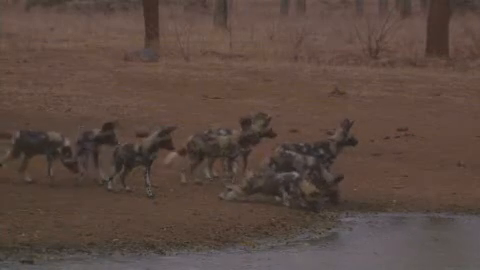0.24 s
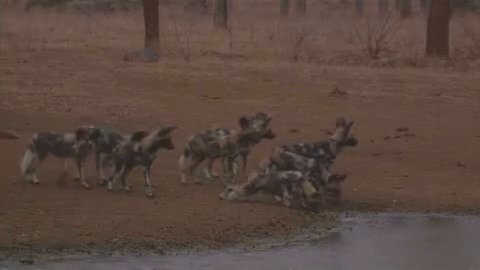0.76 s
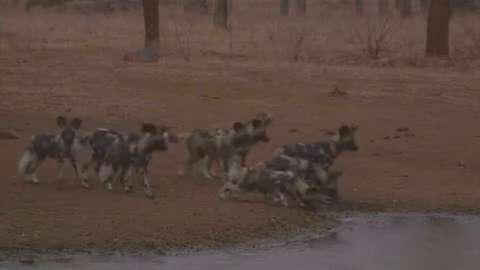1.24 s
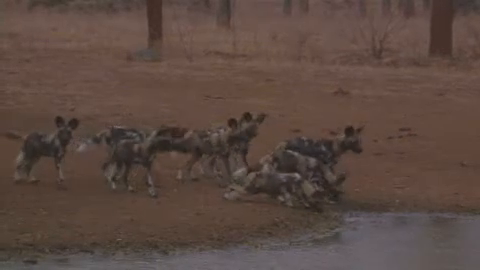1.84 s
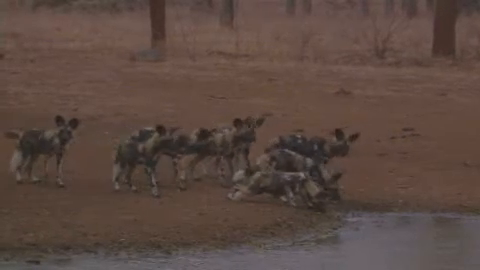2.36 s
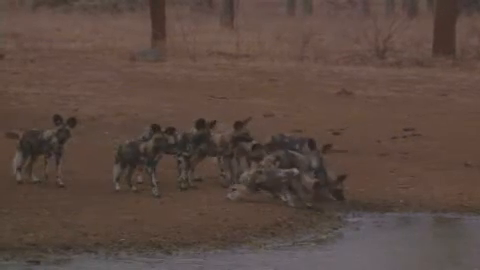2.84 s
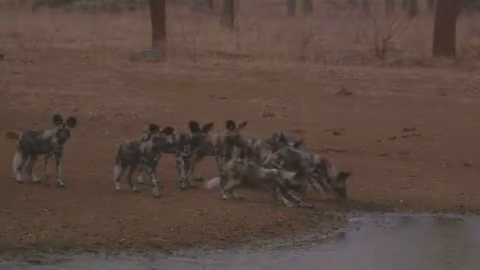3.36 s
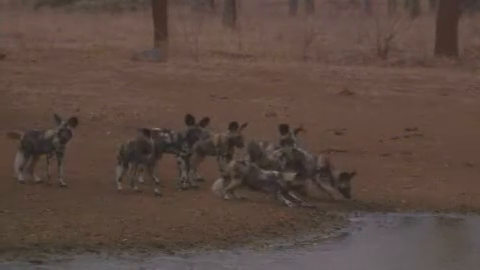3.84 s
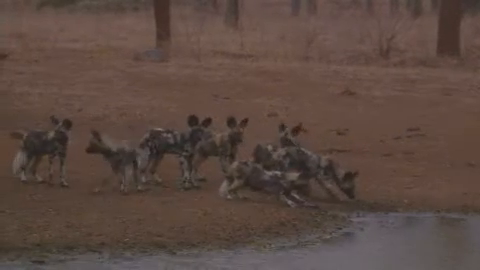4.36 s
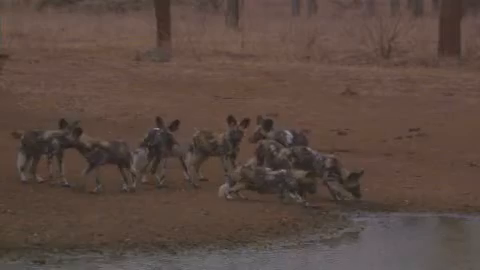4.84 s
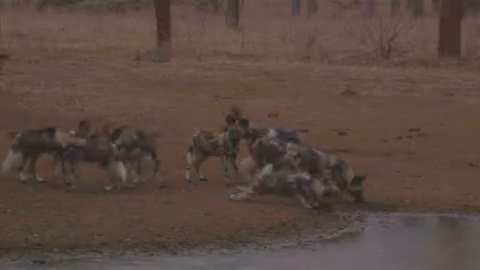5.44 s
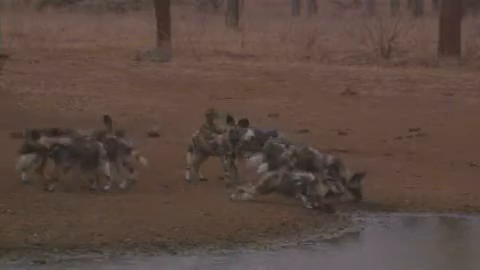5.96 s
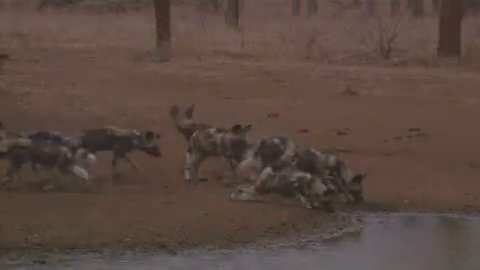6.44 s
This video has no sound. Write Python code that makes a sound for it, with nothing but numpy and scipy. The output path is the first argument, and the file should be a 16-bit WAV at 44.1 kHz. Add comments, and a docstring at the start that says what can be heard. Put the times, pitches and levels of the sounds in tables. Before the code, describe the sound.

Low wind rumbles on the microphone in open dry bush. Some way off, wild dog pups squeak, whine and twitter in a blurred crowd, with a quick hoarse yip run early on. Nearer, two small birds repeat buzzy trills of falling chips that start soft and fast, swell and slow. A hoarse far bird calls two-note phrases and insects chirp faintly. Knocks rattle beside the microphone at the end.

```python
"""From the start wind rumbles (shaped noise) over a quiet bush, a faint hum, insects and a hoarse far bird.
Wild dog pups jostle some way off at a waterhole: gliding whistles squeak and whine, hoarse yips come early,
then one low hoot, perhaps a far dove; a crowd of tiny whistles blurs into twitter. Nearer, a small bird and
its mate repeat slowing trills of falling chips. Now and then something knocks beside the microphone, as filtered
hits that ring a housing; near the end come a thin ring, a rattle of knocks and one dry tick."""
import sys
import numpy as np
from scipy import signal
from scipy.fft import rfft, irfft, next_fast_len
from scipy.io import wavfile
from scipy.ndimage import uniform_filter1d

SR = 44100
rng = np.random.default_rng(int(sys.argv[2]) if len(sys.argv) > 2 else 0)


def int16_out(signal):
    """Quantize to a 16-bit WAV file."""
    q = np.round(np.clip(np.atleast_2d(signal).T, -1, 1) * 32767)
    wavfile.write(sys.argv[1], SR, q.astype(np.int16))


N = 295911
T = np.arange(N) / SR  # time in seconds

# Falling squeaks of the pups. Each row: start in seconds, length of the dive in seconds, top pitch in Hz,
# hold at the bottom in seconds, level in dB.
SQUEAKS = [(.112, .035, 3930, 0, -59), (1.194, 0.032, 3850, 0, -53), (1.232, 0.018, 3540, 0, -62),
           (1.26, .029, 3600, 0, -54.5), (1.35, .027, 3260, 0, -58), (3.673, .03, 4005, 0.00006, -56),
           (3.728, .04, 3850, 0.017, -59.5), (4.5, 0.026, 3800, 0.0027, -65),
           (4.53, 0.028, 4040, 0.0055, -60), (5.419, .035, 3980, 0, -67), (6.033, 0.038, 3950, 0.016, -55),
           (6.092, 0.032, 3830, 0.0048, -51.5), (6.498, 0.028, 4000, .024, -57.5)]
# Short whines and squeaks of the pups, some longer, with a smooth glide or steady pitch, and one low hoot
# at 0.82 s, perhaps a far dove. Each row: start in seconds, length in seconds, middle pitch in Hz,
# glide from start to end in Hz, level in dB, waver as a share of the pitch.
GLIDES = [(0.024, 0.047, 2380, 450, -61, 0.031), (.13, .11, 2790, -280, -68, 0.0096),
          (.82, 0.33, 815, -1, -67.5, 0.048), (.945, .17, 2170, 154, -62, 0.042),
          (1.112, .06, 2435, 150, -58, 0.055), (1.166, 0.048, 2380, -100, -51, 0.024),
          (1.21, .06, 2370, -200, -53, 0.031), (1.267, 0.051, 2230, 150, -55, 0.037),
          (1.847, 0.062, 2765, 2, -54.5, .003), (1.894, .07, 2705, 32, -58.5, 0.0035),
          (2.001, .2, 2675, -250, -64, .045), (2.169, .05, 1800, -400, -69, .07),
          (3.029, .12, 1680, 0, -69.5, 0.065), (3.78, 0.062, 2610, -200, -68, .03),
          (5.391, 0.036, 3860, -700, -62, .038), (6.084, 0.059, 1505, -120, -57, 0.022)]
# Short hoarse yips of a pup. Each row: middle of the yip in seconds, pitch in Hz, level in dB.
YIPS = [(0.522, 1041, -49), (.553, 1093, -50), (.58, 1037, -52), (0.607, 1037, -55), (.627, 1060, -49.5)]
# Loudness of the whole litter's chatter. Each row: time in seconds, level in dB before a common trim.
CHATTER = [(0, -60.5), (.35, -63), (.82, -70), (1.17, -60), (1.35, -64), (2.12, -64), (2.3, -70.5),
           (3.65, -72.5), (3.85, -69.5), (4.2, -69), (4.55, -64.5), (4.9, -75.5), (5.8, -73.5),
           (6.15, -65.5), (6.4, -75), (6.7, -70)]
# How loud the litter's twitters are at each pitch. Each row: pitch in Hz, level in dB.
TWITTER = [(1700, -15.5), (2200, -2), (2800, 0), (3600, -0.5), (4600, -4), (5600, -15), (7000, -11.5)]
# Trills of the two birds. Each row: first chip in seconds, last chip in seconds, number of chips,
# number of gaps until it slows, full level in dB before a common trim, extra dB at the soft start, pitch in Hz.
TRILLS = [(.038, .038, 1, 0, -41.5, 0, 3760), (.127, .656, 11, 4.9, -43, -6, 3805),
          (1.304, 1.685, 8, .5, -42, -8, 3760), (1.538, 2.061, 11, 4.8, -43, -7, 3815),
          (2.980, 3.537, 12, 4.4, -42, -9, 3820), (3.122, 3.550, 9, 2.7, -43.5, -7, 3740),
          (4.343, 4.866, 11, 5.1, -43, -8, 3800), (4.518, 5.012, 11, 4.0, -42.3, -11, 3760),
          (5.772, 6.319, 11, 4.5, -43, -8, 3805), (6.217, 6.591, 8, 1.0, -42, -5, 3770)]
# Calls of the far bird. Each row: start in seconds, level of the first note in dB.
FAR_CALLS = [(.81, -71), (1.75, -70), (2.66, -60), (3.33, -66), (4.02, -65), (4.69, -65.5), (5.38, -62.5),
             (6.09, -61.5)]
# Knocks by the microphone. Each row: start in seconds, peak in dB before the echo, brightness limit in Hz.
KNOCKS = [(3.269, -47.5, 700), (3.636, -50, 350), (5.825, -47, 2500), (6.27, -44, 786), (6.593, -46, 600),
          (6.61, -46, 347), (6.64, -41, 4000), (6.647, -31.5, 3020), (6.676, -45.5, 2220)]
# Resonances of the knocked housing. Each row: pitch in Hz, width in Hz, strength in dB.
HOUSING = [(356, 89, 0.5), (875, 260, 4), (1680, 1000, -0.5), (2100, 64, -5), (2650, 70, -37),
           (5150, 1600, -11)]
# Strength of the wind. Each row: time in seconds, rumble in dB and buffeting in dB, both before a trim.
WIND = [(0, -35.5, -48.5), (.15, -38, -46.5), (.41, -40.5, -45.5), (.5, -34, -42.5), (.75, -38.5, -41),
        (.85, -39.5, -46.5), (1.25, -41, -53), (1.55, -39, -45), (1.95, -40.5, -43.5), (2.2, -44, -50),
        (2.93, -42.5, -54.5), (3.1, -45, -58), (3.9, -51.5, -62.5), (4.05, -46.5, -56.5),
        (5.15, -47.5, -64.5), (5.33, -42.5, -57), (5.5, -47, -61), (6.71, -43.5, -55.5)]
# Tone colour of the wind's low rumble. Each row: frequency in Hz, level in dB.
RUMBLE = [(4, 7.5), (14, 9.5), (22, -1.5), (38, -3.5), (55, -5.5), (80, -8.5), (110, -13.5), (150, -31.5)]
# Tone colour of the wind's quicker buffeting. Each row: frequency in Hz, level in dB.
BUFFET = [(50, -18.5), (90, -5.5), (125, 0), (200, -6.5), (300, -17), (450, -26.5), (900, -45.5)]
# Tone colour of the quiet bush. Each row: frequency in Hz, level in dB.
BUSH = [(150, 6), (350, 4), (480, 1), (620, 3.5), (740, 1.5), (880, 5), (1200, -2.5), (1800, -3),
        (2600, -3.5), (3600, -7), (5000, -12), (7000, -12), (10500, -12.5)]


def undb(db):
    """Turn decibels into a gain."""
    return 10 ** (np.asarray(db) / 20)


def unit(x):
    """Scale a sound to an average (rms) strength of 1."""
    return x / np.sqrt(np.mean(x ** 2))


def curve(rows, column=1):
    """Join one column of a table by straight lines in time."""
    rows = np.array(rows)
    return np.interp(T, rows[:, 0], rows[:, column])


def add(out, start_s, x):
    """Mix x into out from a start time, cutting whatever falls outside."""
    i = int(start_s * SR)
    x = x[max(-i, 0):max(N - i, 0)]
    out[max(i, 0):max(i, 0) + len(x)] += x


def noise(points):
    """Make noise of strength 1 whose tone colour follows (Hz, dB) points."""
    hz, db = np.transpose(points)
    size = next_fast_len(N, True)
    f = np.maximum(np.arange(size // 2 + 1) * SR / size, 1)
    gain = undb(np.interp(np.log(f), np.log(hz), db, left=-200, right=-200))
    spectrum = rfft(rng.standard_normal(size)) * gain
    return unit(irfft(spectrum, size)[:N])


def walk(rate_hz):
    """Wander smoothly and at random around 0, with a spread near 1."""
    k = max(int(SR / rate_hz), 1)
    steps = np.repeat(rng.standard_normal(N // k + 1), k)
    return 1.2 * uniform_filter1d(steps, k)[:N]


def resonance(x, hz, width_hz):
    """Ring at one pitch, with gain 1 at its centre."""
    return signal.lfilter(*signal.iirpeak(hz, hz / width_hz, SR), x)


def pan(x, db):
    """Place a sound between the two sides, by left minus right in dB."""
    return x * undb(np.array([[db], [-db]]) / 2)


def scatter(x, t60, wet_db, delay=0.0042):
    """Sound thrown back by trunks and brush: a tail that builds over delay (s) and fades 60 dB in t60 (s)."""
    t = T[:SR * 3 // 2]
    fade = undb(-60 * t / t60) * (1 - np.exp(-(t / delay) ** 2))
    tail = rng.standard_normal(len(t)) * fade
    return undb(wet_db) * signal.fftconvolve(x, tail / np.linalg.norm(tail))[:N]


def pups(yip_s=0.0028):
    """Squeaks, whines, one low hoot and a quick run of six-harmonic yips, with the bush ringing after them."""
    out = np.zeros(N)
    for s, length, top_hz, hold_s, db in SQUEAKS:
        add(out, s, undb(db) * dive(length, top_hz, hold_s))
    for s, length, hz, glide_hz, db, waver in GLIDES:
        pitches = (hz - glide_hz / 2, hz, hz + glide_hz / 2)
        add(out, s, undb(db) * squeak(length, pitches, waver))

    t = T[:SR // 40] - 1 / 80  # zero at the middle of a yip
    for s, hz, db in YIPS:
        rough = 0.12 * rng.standard_normal(len(t))  # random pitch makes it hoarse
        phase = 2 * np.pi * np.cumsum(hz * (1 - 4 * t + rough)) / SR
        mouth = enumerate([-8, -5.5, -4.5, -6, -17, -13.0])  # dB of each harmonic
        voice = sum(undb(mouth_db) * np.sin((k + 1) * phase) for k, mouth_db in mouth)
        add(out, s + t[0], undb(db) * np.exp(-(t / yip_s) ** 2) * voice)

    near_echo = scatter(out, t60=0.15, wet_db=-3.0)
    far_echo = scatter(out, t60=0.48, wet_db=-12.0, delay=0.023)
    return out + near_echo + far_echo


def dive(length, top_hz, hold_s, waver=.017, dive_share=.35, rebound_hz_per_s=5500):
    """A whistle loses a share of its top pitch, then may linger at the bottom while it creeps up."""
    t = T[:int((length + max(hold_s, 0)) * SR)]
    fall = np.sin(np.pi / 2 * np.minimum(t / length, 1)) ** 2
    rebound = rebound_hz_per_s * np.maximum(t - length, 0)
    return whistle(top_hz * (1 - dive_share * fall) + rebound, waver)


def squeak(length, pitches, waver=0.025):
    """A whistle glides smoothly through three pitches."""
    u = np.linspace(0, 1, max(int(length * SR), 8))
    bend = np.polyval(np.polyfit([0, .5, 1], pitches, 2), u)
    return whistle(bend, waver)


def whistle(bend, waver, octave_db=-26):
    """A thin voice follows a pitch curve; the more its pitch wavers, the more its level flutters."""
    u = np.linspace(0, 1, len(bend))
    chance = rng.standard_normal((2, 160))  # 400 random points a second
    tremor, flutter = (np.interp(T[:len(bend)] * 400, np.arange(160), row) for row in chance)
    phase = 2 * np.pi * np.cumsum(bend * (1 + waver * tremor)) / SR
    envelope = np.sqrt(4 * u * (1 - u)) * (1 + min(14 * waver, .6) * flutter)
    return envelope * (np.sin(phase) + undb(octave_db) * np.sin(2 * phase))


def litter(count=1700, level_db=-0.5):
    """Many small falling twitters, heard mostly by way of the bush, which blurs them to a hiss."""
    out = np.zeros(N)
    points_hz, points_db = np.transpose(TWITTER)
    for when, length, pitch in rng.random((count, 3)):
        hz = points_hz[0] + pitch * (points_hz[-1] - points_hz[0])
        gain = undb(np.interp(hz, points_hz, points_db))
        twitter = squeak(0.01097 + 0.0209 * length, hz * np.array([1.15, 1, .88]))
        add(out, when * N / SR, gain * twitter)
    blurred = unit(out + scatter(out, t60=0.45, wet_db=7))
    return blurred * undb(curve(CHATTER) + level_db)


def trill(length_s=0.0047, fall_hz_per_s=24000, onset_hz=50, onset_db=-32, lead=0.21, octave_db=-28,
          rough_hz=35, trim_db=1.0):
    """Each chip is a whistle that dives from a soft high start, loudest as it crosses the throat's resonance."""
    out = np.zeros(N)
    t = T[:SR // 20] - 1 / 40  # zero at the middle of a chip
    notes = chips()
    for (s, db, hz), chance in zip(notes, rng.standard_normal((len(notes), 20))):
        u = t * np.clip(undb(-(db + 43) * .4), .95, 1.35)  # soft chips are quicker
        quiver = np.interp(t, np.linspace(t[0], t[-1], len(chance)), chance)
        steep_start = onset_hz * np.maximum(-u / .008, 0) ** 2
        pitch_hz = hz + steep_start - fall_hz_per_s * u + rough_hz * quiver
        phase = 2 * np.pi * np.cumsum(pitch_hz) / SR

        blow = np.exp(-((u + .001) / .012) ** 4) * (1 + .4 * quiver)
        throat = np.exp(-(u / length_s) ** 2)
        onset = np.exp(-((u + .015) / .004) ** 2)
        envelope = (1 - lead) * throat + lead * blow + undb(onset_db) * onset
        octave = undb(octave_db) * (throat + blow) / 2 * np.sin(2 * phase)
        add(out, s + t[0], undb(db + trim_db) * (envelope * np.sin(phase) + octave))

    near_echo = scatter(out, t60=0.14, wet_db=-11.5, delay=0.0033)
    far_echo = scatter(out, t60=0.65, wet_db=-18.5, delay=0.015)
    return out + near_echo + far_echo


def chips(slowdown=1.64, slowing_chips=.8, swell_chips=6.0, scatter_db=.5, scatter_hz=11):
    """Trills start quick and soft, swell and slow down; gives (s, level dB, pitch Hz) for every chip."""
    rows = []
    for first_s, last_s, count, turn, full_db, soft_db, hz in TRILLS:
        k = np.arange(int(round(count)))
        # late gaps are slowdown times the early ones; the change is spread over slowing_chips
        gaps = 1 + (slowdown - 1) / (1 + np.exp((turn - k) / slowing_chips))
        beats = np.cumsum(gaps) - gaps
        times = first_s + (last_s - first_s) * beats / max(beats[-1], 1)
        chance = rng.standard_normal((len(k), 2))
        swell = soft_db * np.maximum(1 - k / swell_chips, 0)
        db = full_db + swell + scatter_db * chance[:, 0]
        rows += zip(times, db, hz + scatter_hz * chance[:, 1])
    return rows


def knocks():
    """Each knock is a sharp hit with a short rattle; it is dulled to its brightness and rings the housing."""
    out = np.zeros(N)
    t = T[:SR // 10]
    for s, db, bright_hz in KNOCKS:
        push = .07 * rng.standard_normal(len(t)) * np.exp(-t / .007)
        push[0] += 1
        push = signal.lfilter(*signal.butter(2, min(bright_hz, SR / 3), fs=SR), push)
        ring = sum(undb(mode_db) * resonance(push, hz, width) for hz, width, mode_db in HOUSING)
        add(out, s, undb(db) * ring / np.abs(ring).max())
    return out + scatter(out, t60=.2, wet_db=-8.5, delay=0.0027)


def tick(db=-36, relax_s=0.0012):
    """One dry tick: a sudden step that relaxes."""
    out = np.zeros(N)
    step = -undb(db) * np.exp(-T[:SR // 50] / relax_s)
    add(out, 6.623, step)
    return out


def ping(hz=1370, db=-66, t60=1.0):
    """A faint thin ring: a pure tone that starts at 6.1 s and fades."""
    t = np.maximum(T - 6.1, 0)
    return undb(db - 60 * t / t60) * np.sin(2 * np.pi * hz * t)


def far_bird(rise_s=.09, fall_s=0.1366, gap_s=.09, start_hz=810, top_hz=1030, end_hz=860, second_db=-2):
    """A hoarse call from far away, one note up and one down, smeared by the trees."""
    out = np.zeros(N)
    for s, db in FAR_CALLS:
        up = squeak(rise_s, (start_hz, 900, top_hz), waver=0.044)
        down = squeak(fall_s, (top_hz, 920, end_hz), waver=.07)
        add(out, s, undb(db) * up)
        add(out, s + gap_s, undb(db + second_db) * down)
    return out + scatter(out, t60=0.32, wet_db=-8.5, delay=.04)


def insect(hz=7310, db=-75):
    """A high, slightly rough tone is let through in paired chirps on a steady beat."""
    cycle = (T + .035) % .268  # seconds into each beat
    first = np.exp(-((cycle - .035) / .014) ** 2)
    second = np.exp(-((cycle - .073) / .014) ** 2)
    phase = 2 * np.pi * np.cumsum(hz + 45 * walk(310)) / SR
    return undb(db) * (first + second) * np.sin(phase)


def shrill(hz=6520, db=-85):
    """A fainter insect simmers behind the first: a tone of unsteady pitch and level."""
    flicker_db, spread_hz = 3 * walk(25), 130 * walk(600)
    return undb(db + flicker_db) * np.sin(2 * np.pi * np.cumsum(hz + spread_hz) / SR)


def wind(rumble_db=7.0, buffet_db=-3.0):
    """Slow pressure swings on the microphone; gusts add quicker eddies."""
    rumble = noise(RUMBLE) * undb(curve(WIND) + rumble_db)
    buffeting = noise(BUFFET) * undb(curve(WIND, column=2) + buffet_db)
    return rumble + buffeting


def bush(hiss_db=-64, hum_hz=150.7, hum_db=-59):
    """Soft outdoor hiss and the hum of a distant motor, wavering in pitch and level."""
    phase = 2 * np.pi * np.cumsum(hum_hz + 0.756 * walk(4.6)) / SR
    hum = np.sin(phase) * undb(hum_db + 2.3 * walk(3.92))
    hiss = noise(BUSH) * undb(hiss_db + .5 * walk(3.58))
    return hiss + hum


def scene():
    """All sources lie near the middle, most of them a little louder on the right; soft air differs per side."""
    air = np.array([noise(BUSH), noise(BUSH)]) * undb(-78.5)
    others = pups() + litter() + knocks() + tick() + ping() + far_bird() + bush()
    # pans are left minus right in dB
    right_of_centre = pan(trill(), -3) + pan(others, -1.56) + pan(wind(), -3.5)
    return right_of_centre + insect() + shrill() + air


def record(dry, top_hz=10800):
    """The sound eases in and out over 5 ms, and the recorder cuts everything above its top frequency steeply."""
    ease = np.minimum(np.minimum(T, T[-1] - T) / .005, 1)
    low_pass = signal.ellip(10, .2, 70, top_hz, fs=SR, output="sos")
    return signal.sosfilt(low_pass, dry * ease)


dry = scene()
out = record(dry)
int16_out(out)
```